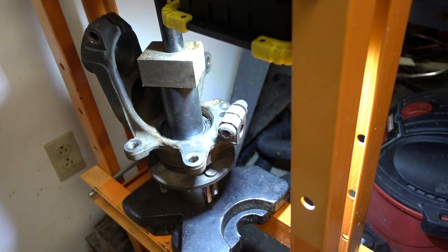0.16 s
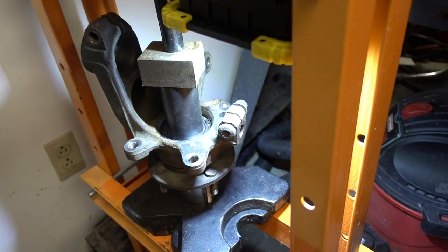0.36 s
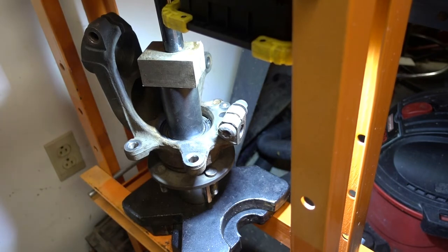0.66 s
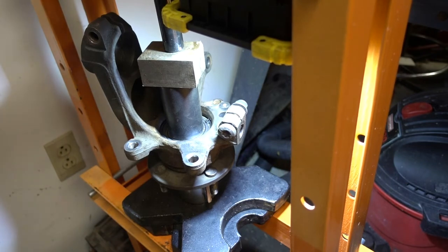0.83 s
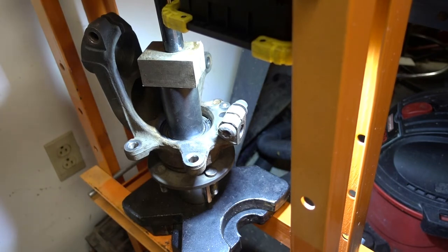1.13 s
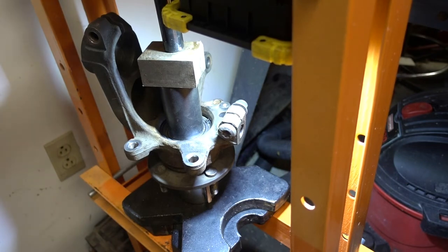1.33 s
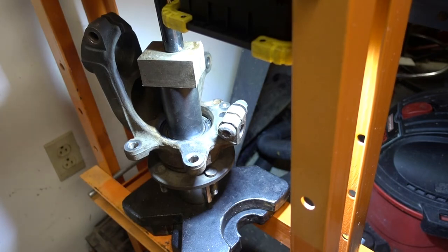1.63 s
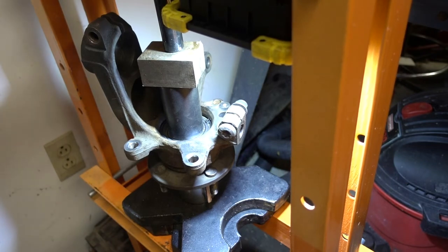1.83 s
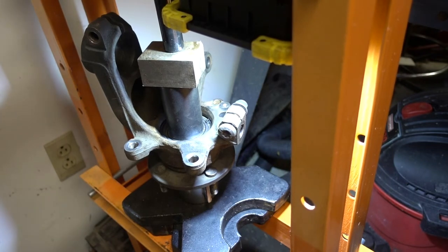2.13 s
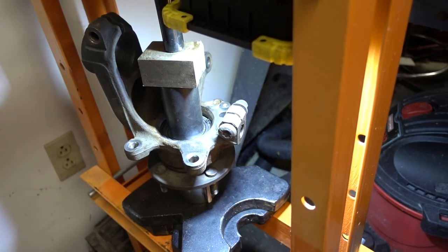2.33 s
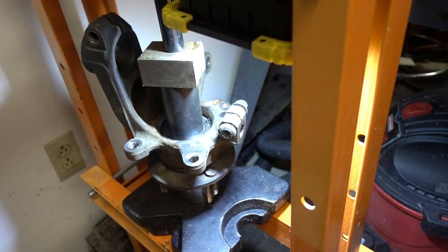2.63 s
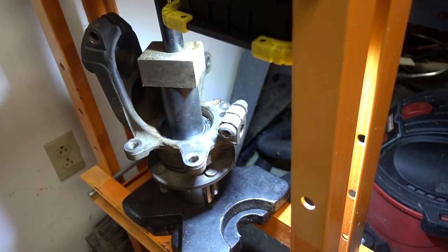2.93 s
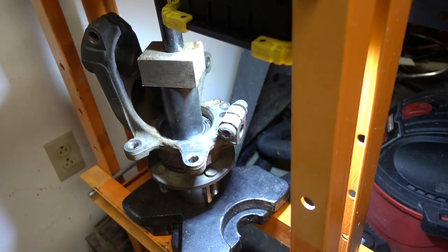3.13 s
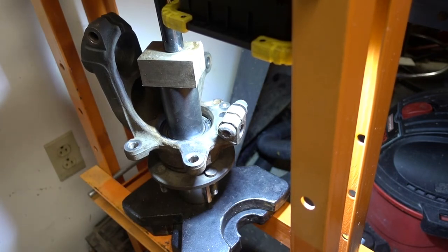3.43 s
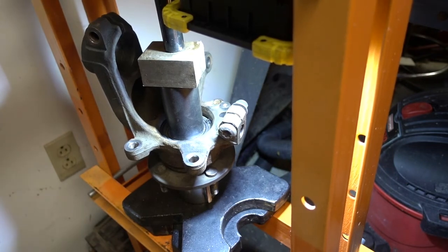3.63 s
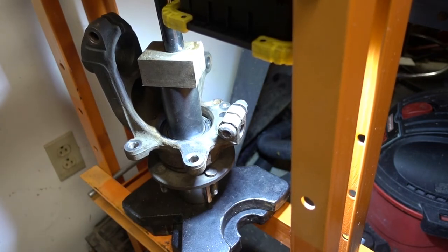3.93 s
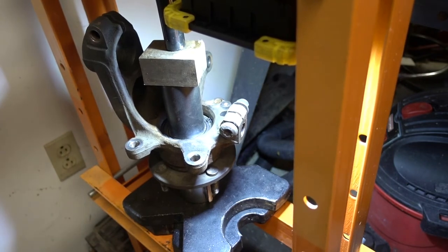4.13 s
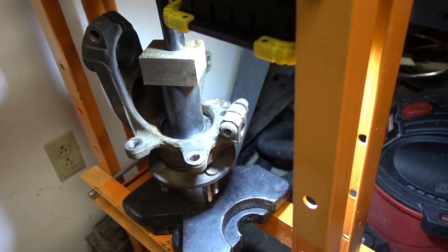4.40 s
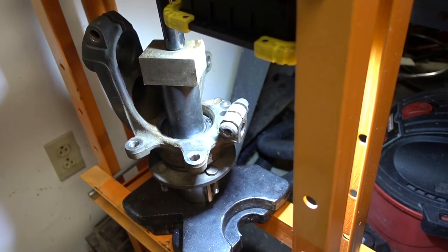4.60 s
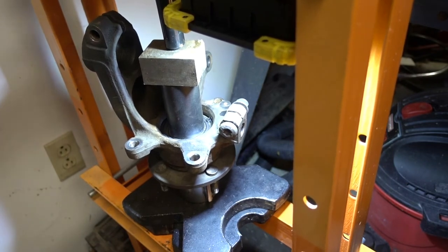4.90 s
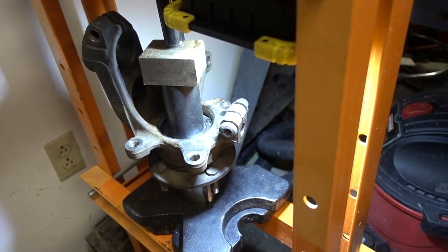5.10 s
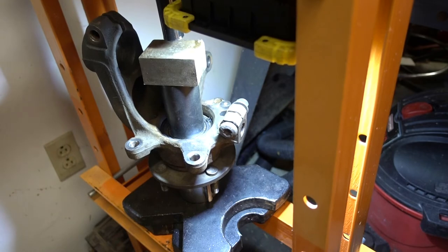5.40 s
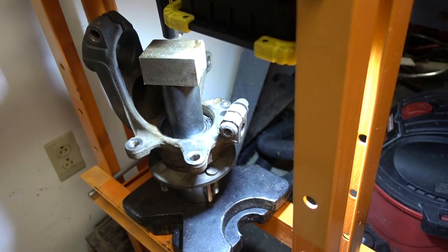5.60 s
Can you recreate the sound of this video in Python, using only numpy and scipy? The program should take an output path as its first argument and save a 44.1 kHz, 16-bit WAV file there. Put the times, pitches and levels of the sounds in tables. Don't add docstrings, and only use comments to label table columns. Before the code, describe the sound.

Metallic clicks and ringing knocks from a hand-pumped press with oil hisses, then a brief scraping screech and a loud, long metal squeal.

```python
import sys
import numpy as np
from scipy import signal
from scipy.fft import rfft, irfft, next_fast_len
from scipy.io import wavfile

SR = 44100
rng = np.random.default_rng(int(sys.argv[2]) if len(sys.argv) > 2 else 0)


def invert_db(x):
    u = np.asarray(x, float) / 20
    return 10 ** u


def unload_audio(sound):
    columns = np.transpose(np.atleast_2d(sound))
    steps = np.round(np.clip(columns, -1, 1) * 32767)
    wavfile.write(sys.argv[1], SR, steps.astype(np.int16))


N = 253575
T = np.arange(N) / SR

# f/Hz, density/dB per Hz
ROOM_TONE = [(82, -32), (140, -4), (444, -2.5), (481, -5), (965, -6.5), (1300, -5.5), (1830, -11),
             (2270, -12), (2770, -14.5), (3380, -16), (5140, -22), (15100, -26), (16300, -48)]
# f/Hz, density/dB per Hz
RUMBLE = [(27, -30), (33, -25), (40, 4.5), (54, 1), (123, -3.5), (160, -8.5), (210, -67), (350, -120)]
# f/Hz, width/Hz, level/dB
HUM = [(601, 9.6, -70), (833, 23, -81.5), (1318, 4.5, -67.5), (2316, 11, -74)]
# t/s, level/dB, recovery/s
DUCKS = [
    (3.93, -3.5, 0.93),
    (4.86, -2, 0.4),
]
# t/s, level/dB, width/s
SWELLS = [
    (1.95, 4.5, 0.12),
    (2.35, 1, 0.24),
    (3.14, 3, 0.091),
    (5.45, 3.5, 0.14),
]
ROOM_DB, RUMBLE_DB = -58, -57.5

# f/Hz, correlation/1 (clipped at 0)
LIKENESS = [(60, 1.0), (180, 0.93), (550, 0.74), (1650, 0.43), (4970, -0.84), (15000, -1.44)]
# f/Hz, left minus right/dB
LEAN = [(300, 0), (600, -1), (1400, 1.5), (3100, 1), (6800, -2), (15000, -4)]
# f/Hz, t60/s
GARAGE = [(250, 1), (1000, 0.75), (3000, 0.27), (8000, 0.25), (15000, 0.13)]
EDGES_HZ = 25 * 2 ** np.arange(0, 9.6, .5)

# t/s, peak level/dB, rise/s per 20 dB, fade/s per 20 dB
OIL = [
    (.036, -52, 0.096, .02),
    (.106, -61.5, .03, 0.29),
    (1.602, -46.5, 0.011, 0.13),
    (3.354, -56, 0.24, 0.076),
    (3.41, -53, 0.058, .08),
    (3.532, -44.5, 0.094, 0.084),
    (3.666, -54.5, 0.11, 0.074),
    (3.8, -59, 0.12, 0.096),
    (4.614, -61.5, 0.045, 0.27),
]
# f/Hz, density/dB per Hz
OIL_COLOUR = [(1180, -2), (2000, -0.5), (3240, -4), (4290, -5.5), (5390, -1), (6660, -8.5), (12600, -5.5),
              (16300, -5)]
# t/s, length/s, first f/Hz, last f/Hz, level/dB
WHISTLES = [
    (0, 0.11, 15200, 15250, -37.5),
    (.14, .12, 15200, 15120, -58),
    (0, 0.031, 8030, 8240, -40),
    (.41, .1, 14600, 13600, -77),
    (.55, .07, 13300, 11800, -78),
    (1.502, .19, 1560, 1718, -56),
    (4.037, 0.068, 292, 323, -50.5),
]
# t/s, peak level/dB, f/Hz
CHIRPS = [
    (0.305, -46, 2520),
    (0.338, -41.5, 2630),
]

# t/s, handle peak/dB, pin peak/dB, snap peak/dB
KNOCKS = [(0.0249, -41.5, -34, -40), (0.151, -43, -32, -77), (0.6179, -29.5, -29, -40),
          (0.9797, -37, -25, -63), (1.456, -73, -73, -56), (1.7513, -40, -47, -45.5),
          (1.8855, -28, -40, -41), (2.2066, -61, -68, -74), (2.7816, -65, -58, -62),
          (3.0291, -35.5, -42, -47), (3.1151, -33.5, -38, -36.5), (3.1874, -24.5, -42, -25),
          (3.4563, -30.5, -28, -19), (3.802, -63, -85, -69), (4.777, -54, -59.5, -65.5)]
# t/s, handle peak/dB, pin peak/dB, snap peak/dB
TICKS = [
    (.003, -62, -40, -47),
    (.019, -52, -54, -54),
    (3.149, -40.5, -56, -45),
    (3.192, -26.5, -50, -29),
    (3.439, -35.5, -44, -66),
    (3.451, -34, -53, -52),
    (3.461, -39, -55, -57),
]
KNOCK_BANDS_HZ = [2450, 2950, 3370, 3800, 5000, 6300]
# f/Hz, level/dB, t60/s
HANDLE = [(2040, -20, .2), (2285, -14, .4), (2458, -8, .3), (2505, -4, .22), (2934, -18, .15),
          (3315, -11, .25), (3402, 0, .3), (3740, -20, .12), (4400, -26, .04), (4947, -26, .04),
          (5600, -26, .04), (6374, 1, .13), (6530, -16, .2), (8135, -8, .1), (10520, -30, .08)]
# t/s, posts peak/dB, cross beam peak/dB, bed plate peak/dB
THUDS = [(0.019, -46, -46, -80), (0.099, -47, -47.5, -73), (0.152, -44, -61, -86), (0.619, -33, -33, -35),
         (0.977, -43.5, -57.5, -64), (1.454, -51.5, -56, -49), (1.502, -47, -59, -63),
         (1.75, -42.5, -47, -42), (1.884, -25, -27.5, -30.5), (2.205, -48, -52, -46.5),
         (2.779, -44, -56, -51), (3.029, -37, -47.5, -60), (3.114, -43.5, -37, -48),
         (3.185, -31, -30.5, -33), (3.454, -35.5, -32.5, -44), (4.773, -61, -53, -74),
         (4.856, -30, -58, -46), (5.611, -26.5, -43, -75.5)]
THUD_BANDS_HZ = [250, 550, 1109, 1146, 1265]
# f/Hz, level/dB, t60/s
FRAME = [(231, -15, 1), (278.5, -11.5, 0.82), (364.5, -14, 0.53), (429.8, -6, 0.96), (480, -2.5, 0.33),
         (550.5, -13, .3), (592.7, -10.5, 1), (656, -7, 1), (711, -7.5, 0.87), (747, -3, 0.35),
         (828, -7.5, 1), (1082, -1, 0.48), (1156, -1, 1), (1170, -3, 1), (936, -12, 0.17), (1220, -4, 0.43),
         (1241, -8, 0.99), (1443, -16.5, 0.31), (1526, -12.5, 0.76), (1650, -2.5, 0.41), (1916, -23, 0.6)]
PIN_SKIRT_DB, PIN_TREBLE_DB, SNAP_TREBLE_DB = -10, -18, -16
CONTACT_S = 0.0044
BUILD_UP_S, BUILD_UP_S_PER_DB, SOFT_BLOW_DB = .008, .0004, -50

# t/s, slip rate/Hz
SCREECH = [
    (3.923, 3150),
    (3.945, 2550),
    (3.99, 1900),
    (4.02, 1500),
    (4.04, 1450),
    (4.055, 1290),
    (4.088, 1290),
]
# multiple/1, level/dB
SCREECH_ORDERS = [(1, -1), (0.801, -9), (1.199, -12), (1.999, -2.5), (2.3, -10.5), (2.999, -3)]
# f/Hz, density/dB per Hz
RUB = [(180, -54), (300, -55), (419, -74), (626, -24), (874, -47), (951, -20), (1540, 1), (2160, 5.5),
       (4580, 8.5), (6950, 7.5), (10600, 10), (15000, 8.5), (16300, -55)]
# t/s, slip rate above rest/Hz
SQUEAL = [
    (5.296, 0),
    (5.38, 53),
    (5.448, 10),
    (5.476, 12),
    (5.49, 50),
    (5.516, 12),
    (5.55, 81),
    (5.602, 66),
    (5.618, 135),
]
# multiple/1, level/dB
SQUEAL_ORDERS = [(1, -3), (2, -7), (3, -3), (4, -9), (5, -5.5), (6, -3.5), (7, -2), (8, -1.5), (9, 7),
                 (10, -3), (11, 0), (12, -0.5), (13, 2), (14, -2), (15, -5.5), (16, -6), (17, -3),
                 (18, -36), (19, 5), (20, -22), (21, -14.5), (22, 0.5), (23, -8), (24, -4.5)]
# f/Hz, density/dB per Hz
SQUEAL_RUB = [(400, -44), (1000, -25), (3000, -17), (6000, -9), (9000, -2), (14500, 1), (16300, -8)]
# f/Hz, level/dB, t60/s
HUB = [(440.4, -38.5, 0.55), (671, -12, 0.18), (683.2, -7, 1), (1262, -11, 0.89), (1355, -25, 0.56),
       (1393, -12.5, .8), (2356, 7.5, 0.08), (2566, -0.5, 0.4), (3585, 15, 0.042), (3840, 5, 0.1),
       (6440, 5.5, 0.067), (7760, 12, 0.12)]
CATCH_S, SHOOT_START_S, SHOOT_END_S, LET_GO_S = 4.838, 4.862, 4.912, 5.648
CATCH_HZ, SHOOT_HZ, REST_HZ, SAG_S = 430, 812, 636, .07
SQUEAL_DB, SQUEAL_SWELL_DB, SQUEAL_SWELL_S = -19, -25, 0.031
LAST_PUSH_S, LAST_PUSH_DB = 5.567, 4
SQUEAL_ROUGH, SETTLE_S, FALTER_S = .19, .034, .06
STUMBLE_S, STUMBLE_WIDTH_S, STUMBLE_ROUGH = 5.51, .025, .22
EDGE_DB_PER_S = 5000


def rms_one(x):
    return x / np.sqrt(np.mean(x ** 2) + 1e-20)


def in_time(rows):
    s, *columns = np.transpose(rows)
    return [np.interp(T, s, column) for column in columns]


def at_hz(points, hz):
    point_hz, values = np.array(points)[:, 0], np.array(points)[:, 1]
    return np.interp(np.log(np.maximum(hz, 1)), np.log(point_hz), values)


def drift(rate, count=N):
    knots = rng.standard_normal(int(count / SR * 200) + 9)
    place = np.arange(count) / SR * np.clip(rate, .1, 200)
    return np.interp(place, np.arange(len(knots)), knots) * 1.2


def ring(x, hz, t60):
    r, w = invert_db(-60 / (t60 * SR)), 2 * np.pi * hz / SR
    return signal.lfilter([0, np.sin(w)], [1, -2 * r * np.cos(w), r * r], x + 1e-18)


def coloured(spectrum, channels=1):
    gain = invert_db(at_hz(spectrum, np.fft.rfftfreq(N, 1 / SR)))
    return rms_one(irfft(rfft(rng.standard_normal((channels, N))) * gain, N))


def bands(x):
    for k, (low, high) in enumerate(zip(EDGES_HZ, EDGES_HZ[1:])):
        sos = signal.butter(2, [low, high], "band", fs=SR, output="sos")
        yield np.sqrt(low * high), signal.sosfilt(sos, x[k % 2])


def above(x, hz):
    f, s, z = signal.stft(x, SR, nperseg=256)
    edge = np.interp(s * SR, np.arange(len(hz)), hz)
    z = z / (1 + (edge / np.maximum(f[:, None], 1)) ** 6)
    return signal.istft(z, SR, nperseg=256)[1][:len(x)]


def stereo(pair):
    alike = np.clip(at_hz(LIKENESS, np.fft.rfftfreq(N, 1 / SR)), 0, 1)
    mid, side = rfft(pair)
    sides = np.sqrt(1 - alike) * side * np.array([[1], [-1]])
    return irfft(np.sqrt(1 + alike) * mid + sides, N) / np.sqrt(2)


def room_tone():
    duck_db = sum(db * (T > s) * np.exp(-np.abs(T - s) / back_s) for s, db, back_s in DUCKS)
    swell_db = sum(db * np.exp(-((T - s) / width_s) ** 2) for s, db, width_s in SWELLS)
    opening_db = 10.5 * np.exp(-T / 0.053)
    air = invert_db(ROOM_DB + opening_db + 1.26 * duck_db) * stereo(coloured(ROOM_TONE, channels=2))
    rumble = invert_db(RUMBLE_DB + swell_db + 1.9 * duck_db) * stereo(coloured(RUMBLE, channels=2))
    hum = sum(invert_db(db) * rms_one(ring(rng.standard_normal(N), hz, 2.7 / width)) for hz, width, db in HUM)
    return air + rumble + hum


def garage(x, wet_db, gap_s, lag):
    span = np.arange(SR) / SR
    noise = rng.standard_normal((2, 2, SR))
    tail = sum(band * invert_db(-60 * span / at_hz(GARAGE, hz)) for hz, band in bands(noise))
    tail = tail * (1 - np.exp(-span / gap_s))
    size = next_fast_len(N + SR)
    hz = np.fft.rfftfreq(size, 1 / SR)
    wet = rfft(tail, size)
    bass = 1 / (1 + (hz / 450) ** 2)
    wet = wet + bass * (wet.mean(axis=0) - wet)
    wet = invert_db(wet_db + 2.5 * np.log2(np.maximum(hz, 1500) / 3000)) * wet
    delay = np.minimum(2 * np.pi * hz * lag / SR, 1.8)
    direct = np.exp(-1j * delay * np.array([[0], [1]]))
    lean = invert_db(at_hz(LEAN, hz) * np.array([[.5], [-.5]]))
    return irfft(rfft(x, size) * lean * (direct + wet), size)[:, :N]


def oil():
    gain = 0
    for s, db, rise_s, fade_s in OIL:
        slope = np.maximum((s - T) / max(rise_s, .003), (T - s) / max(fade_s, .003))
        gain = gain + invert_db(db - 20 * slope)
    return gain * invert_db(1.0 + 0.5 * drift(40)) * coloured(OIL_COLOUR, channels=2)


def whistles():
    out = np.zeros(N)
    for s, length_s, first_hz, last_hz, db in WHISTLES:
        i, count = int(s * SR), int(length_s * SR)
        along = np.arange(count) / count
        hz = (first_hz + (last_hz - first_hz) * along) * (1 + 0.0028 * drift(94, count=count))
        edge = np.minimum(np.minimum(along, 1 - along) * length_s / .004, 1)
        gain = invert_db(db + 2.0 - 9.2 * along + 3.4 * drift(87, count=count))
        out[i:i + count] += gain * edge * np.sin(2 * np.pi * np.cumsum(hz) / SR)
    return out


def chirps(length_s):
    out = np.zeros(N)
    for s, db, hz in CHIRPS:
        swell = np.exp(-((T - s - length_s) / length_s) ** 2)
        out += invert_db(db) * swell * np.sin(2 * np.pi * hz * T)
    return out


def knock_colours():
    s, handle, pin, snap = np.transpose(KNOCKS + TICKS)

    def with_pin(pin_db, other):
        return 20 * np.log10(invert_db(pin + pin_db) + invert_db(other))

    under = with_pin(PIN_SKIRT_DB, handle - 4)
    over = with_pin(PIN_SKIRT_DB, snap)
    treble = with_pin(PIN_TREBLE_DB, snap + SNAP_TREBLE_DB)
    return np.transpose([s, handle, under, pin, over, snap, treble, np.full_like(s, CONTACT_S)])


def strike(events, bands_hz, modes, ring_db, knock_db, spread_db):
    out, span = np.zeros(N + SR), np.arange(SR * 6 // 10) / SR
    short = span[:SR // 8]
    hz, mode_db, t60 = np.transpose(modes)[:, :, None]
    rings = invert_db(mode_db + ring_db - 60 * span / t60) * np.exp(2j * np.pi * hz * span)
    chances = rng.standard_normal((len(events), 3, len(modes), 1))
    for (s, *colour, contact), (level, turn, detune) in zip(events, chances):
        contact, i = max(contact, .0005), int(s * SR)
        gain = invert_db(at_hz(np.transpose([bands_hz, colour]), hz) + spread_db * level)
        rise = 1 - np.exp(-span / (0.13 * contact))
        long_ring = ((gain * np.exp(3j * turn))[:, 0] @ rings).imag
        out[i:i + len(span)] += rise * long_ring
        tones = np.sin(2 * np.pi * hz * (1 + .015 * detune) * short + 3 * turn)
        knock = gain[:, 0] @ (invert_db(np.minimum(mode_db + 13, 0)) * tones)
        fade = invert_db(knock_db - 60 * short / (8.0 * contact))
        out[i:i + len(short)] += rise[:len(short)] * fade * knock
    return out[:N]


def crack(crack_db, turns):
    out, span, events = np.zeros(N), np.arange(SR // 10) / SR, knock_colours()
    hz = np.fft.rfftfreq(len(span), 1 / SR)
    dull_db = 12.5 * np.log2(np.maximum(hz / 7000, 1))
    for (s, *colour, contact), noise in zip(events, rng.standard_normal((len(events), len(span)))):
        per_hz_db = at_hz(np.transpose([KNOCK_BANDS_HZ, colour]), hz) + crack_db - dull_db
        burst = irfft(rfft(noise) * invert_db(per_hz_db) * (hz > 900), len(span))
        i = int(s * SR)
        out[i:i + len(span)] += burst * invert_db(-60 * span / (turns * max(contact, .001)))
    return out


def blows():
    s, posts, beam, bed = np.transpose(THUDS)
    build_up = BUILD_UP_S + BUILD_UP_S_PER_DB * (posts - SOFT_BLOW_DB)
    thuds = np.transpose([s, bed - 2.0, posts, beam, bed, beam, build_up])
    handle = strike(knock_colours(), KNOCK_BANDS_HZ, HANDLE, ring_db=-12.5, knock_db=2.5, spread_db=1.5)
    frame = strike(thuds, THUD_BANDS_HZ, FRAME, ring_db=-13.5, knock_db=-8.5, spread_db=3.0)
    return handle + frame + crack(crack_db=10.0, turns=8.2)


def short_squeal():
    span = SCREECH[0][0], SCREECH[-1][0]
    return span, in_time(SCREECH)[0], -22, np.interp(T, span, (.62, .8))


def long_squeal():
    rise = np.clip((T - SHOOT_START_S) / (SHOOT_END_S - SHOOT_START_S), 0, 1)
    sag = REST_HZ + (SHOOT_HZ - REST_HZ) * np.exp(-np.maximum(T - SHOOT_END_S, 0) / SAG_S)
    sag += in_time(SQUEAL)[0]
    hz = CATCH_HZ + (sag - CATCH_HZ) * np.sin(rise * np.pi / 2)
    since, left = np.maximum(T - CATCH_S, 0), np.maximum(LET_GO_S - T, 0)
    level_db = SQUEAL_DB + SQUEAL_SWELL_DB * np.exp(-since / SQUEAL_SWELL_S)
    level_db -= 17.5 * np.exp(-left / 0.029)
    level_db += LAST_PUSH_DB * np.exp(-((T - LAST_PUSH_S) / 0.01) ** 2)
    rough = SQUEAL_ROUGH + .8 * np.exp(-(since / SETTLE_S / 1.4) ** 3)
    rough += .25 * np.exp(-since / .13) + .5 * np.exp(-left / FALTER_S)
    rough += STUMBLE_ROUGH * np.exp(-((T - STUMBLE_S) / STUMBLE_WIDTH_S) ** 2)
    return (CATCH_S, LET_GO_S), hz, level_db, rough


def stick_slip(motion, orders, jitter, scatter, flicker_db, flicker_rate, rub):
    (start, stop), hz, level_db, rough = motion
    outside = np.maximum(np.maximum(start - T, T - stop) + .001, 0)
    level_db = level_db - EDGE_DB_PER_S * outside
    on = slice(int(start * SR) - 500, int(stop * SR) + 500)
    count, share, hz = on.stop - on.start, np.clip(rough[on], 0, 1), hz[on]
    phase = 2 * np.pi * np.cumsum(hz * (1 + jitter * drift(150, count=count))) / SR
    phase += np.cumsum(scatter * share ** 2 * rng.standard_normal(count))
    tone = np.zeros(count)
    for k, db in orders:
        flicker = flicker_db * min(k * hz[0] / 1000, 1) * drift(flicker_rate, count=count)
        partial = np.sin(k * phase + rng.uniform(0, 2 * np.pi))
        tone += invert_db(db + flicker) * partial * (k * hz < 16000)
    grinding = (1 - share) * coloured(rub)[0][on] + share * coloured(RUB)[0][on]
    grinding = above(grinding, 0.85 * hz) * (1 + 0.3 * np.cos(phase))
    out = np.zeros(N)
    out[on] = np.sqrt(1 - share ** 2) * rms_one(above(tone, 0.72 * hz)) + share * rms_one(grinding)
    return out * invert_db(level_db + drift(45))


def hub(x, body_db):
    x = signal.sosfilt(signal.butter(6, 400, "high", fs=SR, output="sos"), x + 1e-18)
    body = sum(invert_db(db) * ring(x, hz, t60) * (-1) ** k for k, (hz, db, t60) in enumerate(HUB))
    return x + invert_db(body_db) * body


def scene():
    squeals = stick_slip(long_squeal(), SQUEAL_ORDERS, jitter=.005, scatter=.085,
                         flicker_db=5.5, flicker_rate=40, rub=SQUEAL_RUB)
    squeals += stick_slip(short_squeal(), SCREECH_ORDERS, jitter=.03, scatter=.16,
                          flicker_db=7.0, flicker_rate=90, rub=RUB)
    press = blows() + hub(squeals, body_db=-48.5) + chirps(length_s=0.0039) + whistles()
    return garage(press, wet_db=-35.5, gap_s=.008, lag=2) + oil() + room_tone()


def low_pass(x):
    return signal.sosfilt(signal.butter(12, 16490, fs=SR, output="sos"), x)


def record(dry):
    limit = .8
    mix = limit * np.tanh(dry / limit)
    return low_pass(mix)


dry = scene()
out = record(dry)
unload_audio(out)
```